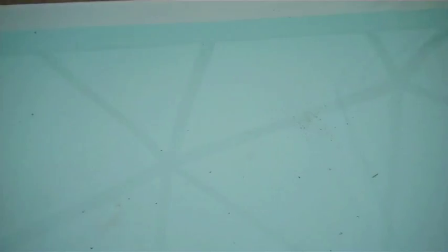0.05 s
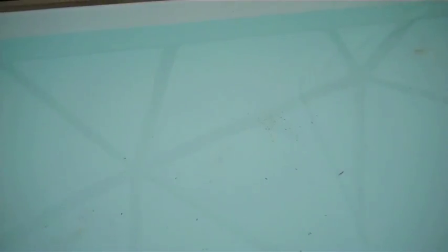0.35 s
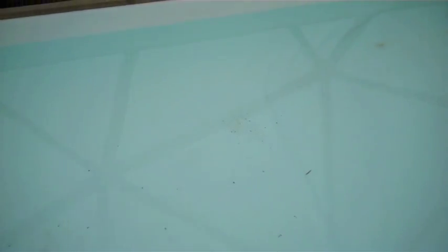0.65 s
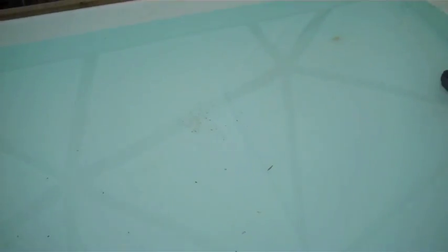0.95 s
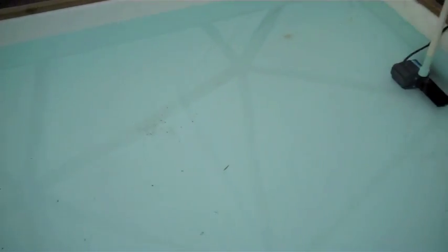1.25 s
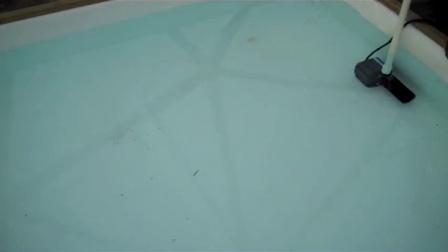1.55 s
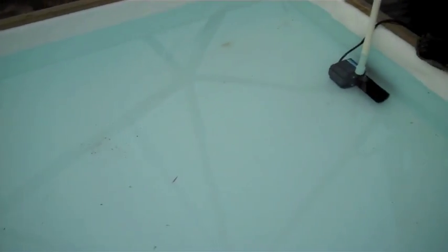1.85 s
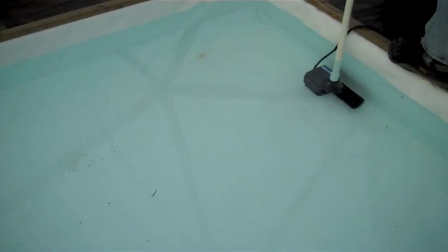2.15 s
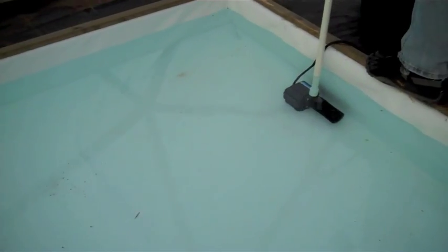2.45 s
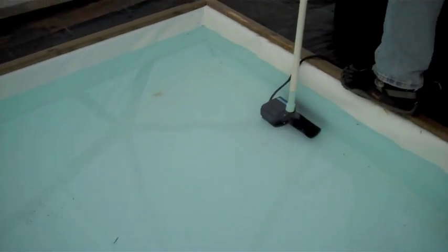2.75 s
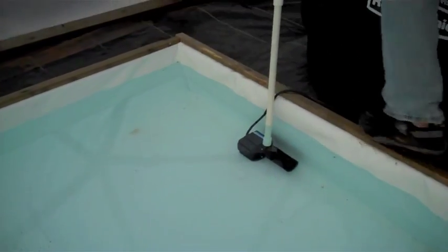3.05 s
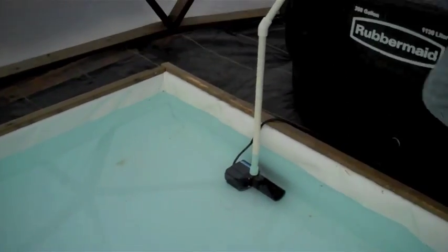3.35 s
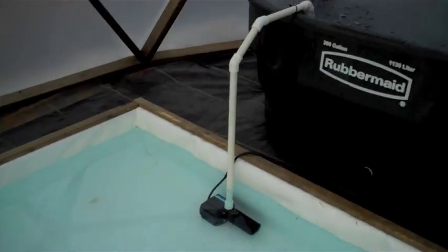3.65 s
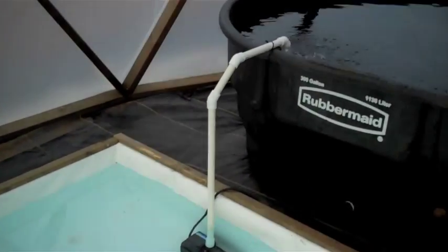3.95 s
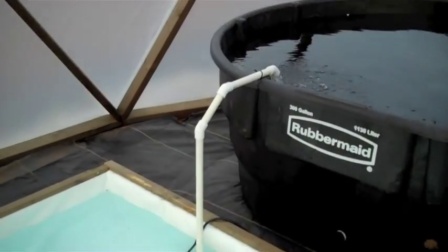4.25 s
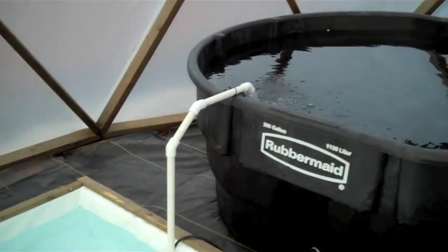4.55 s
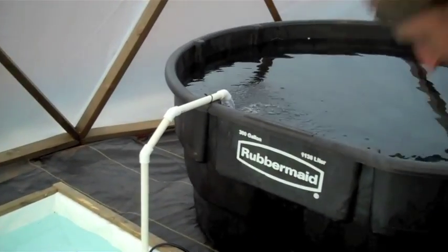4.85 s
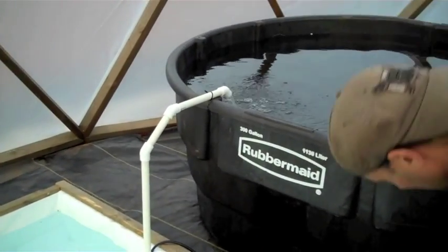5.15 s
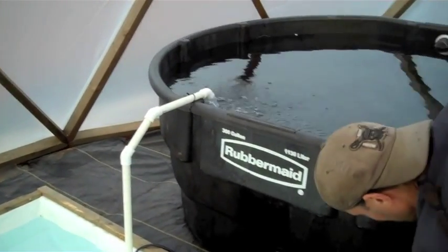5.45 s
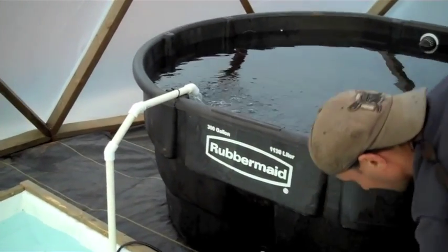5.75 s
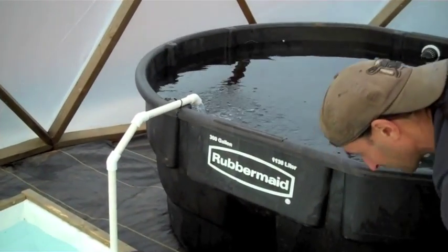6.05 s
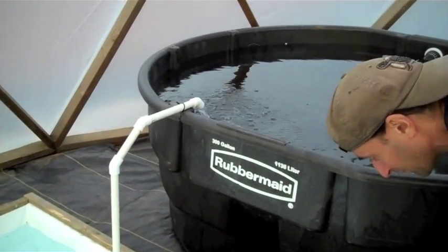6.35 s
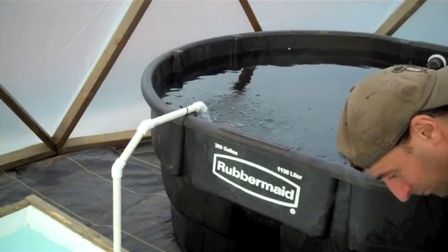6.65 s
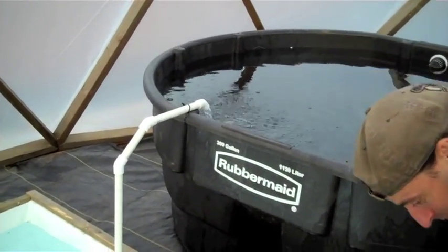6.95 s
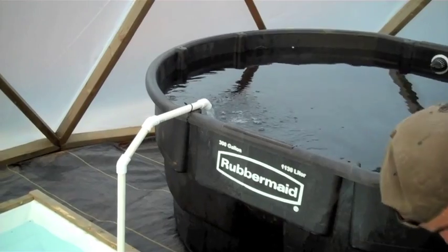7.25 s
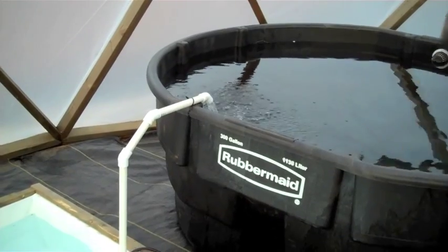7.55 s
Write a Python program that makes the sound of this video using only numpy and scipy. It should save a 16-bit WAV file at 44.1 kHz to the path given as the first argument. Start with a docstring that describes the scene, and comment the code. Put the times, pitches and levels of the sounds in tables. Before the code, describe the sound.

Inside a greenhouse dome, a pumped stream of water splashes unevenly into a big tank, with hollow gurgles, small bubble plinks and crisp droplets. The treble-heavy microphone moves nearer, so the bubbling and a low motor hum slowly grow, joined by a few quiet foot scuffs. Past the middle the flow spurts with a spray hiss, then settles. One sharp, hard clack rings briefly near the end while the water runs on.

```python
"""A submersible pump sends water through a pipe into a big plastic tank under a greenhouse dome.
From the start, trapped air gurgles and fizzes, drops smack on the surface, and pump and fan hum.
From about two seconds someone shuffles closer and the gurgle grows. Near six seconds the jet surges
in a hiss of spray; just before the end something hard clacks once and the dome answers.
It is all heard through two small microphone ports, each ringing at its own treble pitch."""
import sys
import numpy as np
from scipy import signal
from scipy.fft import rfft, irfft, next_fast_len
from scipy.io import wavfile
from scipy.ndimage import map_coordinates

SR = 44100
rng = np.random.default_rng(int(sys.argv[2]) if len(sys.argv) > 2 else 0)


def generate_wav(sig):
    """Save sig (samples, or channels by samples) to the path in sys.argv[1] as 16-bit PCM at SR."""
    pcm = np.round(np.clip(np.atleast_2d(sig).T, -1, 1) * 32767).astype(np.int16)
    wavfile.write(sys.argv[1], SR, pcm)


N = 343980

# Levels are fader settings within each layer; ride curves act as swings about their own mean.
# ride of the splashing where the jet lands: (time [s], level [dB])
FLOW_RIDE = [(0.0, -36), (0.37, -36), (0.85, -39.5), (1.21, -36.5), (1.87, -38), (2.37, -34.5), (3.65, -35),
             (4.78, -33.5), (5.04, -34.5), (5.65, -29), (5.76, -26), (5.97, -30), (6.36, -33), (7.0, -33.5),
             (7.54, -30.5), (7.8, -33)]
# ride of the gurgle, growing as the rim comes closer: (time [s], level [dB])
GURGLE_RIDE = [(0.0, -50), (1.0, -53), (2.78, -48), (3.76, -45.5), (4.63, -46.5), (5.84, -42),
               (6.52, -42.5), (6.78, -46.5), (7.8, -46)]
# ride of the fine spray, thickest in the surge: (time [s], level [dB])
SPRAY_RIDE = [(0.0, -55.5), (0.35, -58), (1.17, -56), (1.74, -58), (3.06, -54.5), (3.6, -57.5), (3.95, -54),
              (5.06, -54), (5.45, -51), (5.82, -44), (6.34, -51.5), (7.8, -51.5)]
# air pockets deep under the jet: (lowest pitch [Hz], highest pitch [Hz], level [dB], share of ride)
GLUG_BANDS = [(465, 559, -64.5, 0.6), (579, 714, -61.5, 0.56), (702, 814, -59.5, 0.079)]
# slugs of water plunging in: (time [s], accent [dB])
WATER_SLUGS = [(0.185, 5), (0.60, 6), (0.74, 5), (0.961, 10.5), (1.26, 4.5), (1.535, 10.5), (2.13, 5.5),
               (2.82, 4.5), (3.06, 3.5), (3.63, 3.5), (3.93, 5), (4.26, 6), (4.87, 2), (5.31, 4),
               (6.45, 4.5), (6.68, 6.5), (7.23, 0.5)]
# featured drops smacking the surface: (time [s], level [dB], pitch [Hz])
DROP_HITS = [(0.1096, -23, 7120), (0.1567, -13.5, 6950), (0.195, -17, 7450), (0.322, -17, 5810),
             (0.4254, -20, 6080), (0.6365, -14, 5800), (1.2217, -14.5, 6540), (1.3236, -18.5, 6270),
             (1.429, -17.5, 7300), (1.614, -18.5, 6350), (1.951, -14.5, 7840), (1.9959, -21, 7370),
             (2.0748, -21, 7740), (2.1505, -19, 6010), (2.1939, -15, 6060), (2.249, -15.5, 6100),
             (2.389, -17.5, 7900), (2.4435, -14.5, 7640), (2.4912, -19, 7480), (2.727, -19, 7460),
             (2.809, -13.5, 7450), (2.942, -18.5, 5900), (3.1258, -11.5, 7250), (3.4835, -20, 7300),
             (3.6144, -19, 7300), (3.6376, -16, 7340), (3.7727, -16.5, 8260), (4.1144, -11.5, 6360),
             (4.3178, -13.5, 7600), (4.5324, -6.5, 5350), (4.6179, -9.5, 6400), (4.6992, -13, 5750),
             (4.9237, -11.5, 6340), (5.238, -7, 6020), (5.2579, -12, 5990), (5.3185, -9, 5320),
             (5.3567, -12.5, 5840), (5.5445, -14, 7500), (5.7024, -10.5, 6200), (6.0815, -6.5, 5930),
             (6.1659, -7, 5240), (6.2454, -3, 7500), (6.615, -12.5, 6340), (6.808, -23, 7680),
             (7.0525, -12, 5540), (7.1127, -11, 5070), (7.2104, -12, 5840), (7.338, -15.5, 7500)]
# featured bubbles that ring out: (time [s], level [dB], pitch [Hz])
PLINK_HITS = [(0.185, -16, 3150), (0.643, -31, 1280), (1.256, -31.5, 1420), (1.448, -23, 3700),
              (1.767, -32.5, 1264), (1.885, -31, 1760), (2.94, -19, 4000), (3.057, -29, 1620),
              (3.194, -24.5, 2230), (3.404, -22, 3330), (3.255, -29, 1700), (4.029, -30, 1500),
              (4.06, -27, 1100), (4.288, -24, 2380), (4.701, -18.5, 3780), (4.919, -21.5, 2880),
              (5.12, -22.5, 2240), (5.122, -18, 3470), (5.416, -20, 3200), (6.569, -21.5, 3280)]
# featured bubbles that burst: (time [s], level [dB])
SNAP_HITS = [(0.9272, -33), (1.5359, -37), (2.5323, -34), (2.7062, -41), (2.9433, -29), (4.0236, -28.5),
             (4.1143, -25), (4.5633, -26.5), (5.3108, -28), (6.2439, -21), (6.8732, -18), (7.0512, -26),
             (7.112, -23.5)]
# contacts of the clack: (time [s], strength [dB], low-pass cutoff [Hz])
CLACK_CONTACTS = [(7.3892, -11, 7000), (7.3963, 1.5, 12000), (7.3982, 1.5, 2800), (7.398, -7, 7000),
                  (7.4057, -8.5, 10000)]
# modes of the hard object: (pitch [Hz], level [dB], t60 [s])
CLACK_RINGS = [(300, -36, 0.03), (1070, -29, 0.013), (1700, -17.5, 0.0096), (2240, -11.5, 0.0039),
               (3100, -8, 0.0029)]
# feet shuffling and bumping on the floor: (time [s], level [dB], thud pitch [Hz])
FOOTFALLS = [(2.294, -37, 303), (2.96, -41, 478), (3.546, -30.5, 500), (3.57, -32, 490),
             (3.598, -30.5, 483), (4.273, -35, 310), (4.489, -35.5, 505), (6.29, -33, 318),
             (7.09, -33.5, 603)]
# hum of the pump: (pitch [Hz], level [dB])
PUMP_TONES = [(97, -63.5), (120, -68.5), (301, -68)]
# hum of the fan, louder near the tank: (time [s], fundamental [dB], octave [dB])
FAN_LEVELS = [(0, -66, -80), (1.3, -66, -75), (2.2, -62.5, -72.5), (3.2, -67.5, -66.5), (5.0, -59, -66),
              (5.5, -59, -63.5), (5.9, -59.5, -58.5), (6.8, -57, -56.5), (7.3, -57, -62), (7.8, -54.5, -58)]
# EQ of bubbles, spray, clack tail, scuffs and rumble: (frequency [Hz], level [dB])
BUBBLE_EQ = [(400, -50), (520, 7), (620, -5), (760, 16), (950, -1.5), (1250, 1.5), (1600, -2), (2100, -4),
             (2800, -2.5), (4000, -4), (5600, 3.5), (7600, 3.5), (9500, -5.5), (14000, 1)]
SPRAY_EQ = [(300, -7), (1000, -12), (3000, 2.5), (6000, 0.5), (10000, 1), (14000, 8.5)]
CLACK_TAIL_EQ = [(100, -30), (280, -9), (450, -23), (800, -7), (1200, -3), (1600, -0.5), (2800, 3),
                 (4000, -4.5), (7500, -7), (14000, -10)]
SCUFF_EQ = [(60, -14), (140, 1), (280, -4), (600, 1), (1200, 4), (3000, -33), (9000, -40)]
RUMBLE_EQ = [(20, -23), (45, -6), (70, -1), (110, 3), (160, -3), (220, -5.5), (400, -7), (800, -1),
             (2000, -12.5), (10000, -31)]
# hollow resonances of the tank: (pitch [Hz], width [Hz], level [dB])
TANK_RESONANCES = [(495, 20, -8.5), (753, 39, -4), (1180, 210, -38.5), (1580, 120, -10.5)]
# the microphone's turn towards the tank: (time [s], delay at the left port [ms])
MIC_TURN = [(0, 0.065), (1.3, 0.073), (2.3, 0.047), (7.8, 0.024)]
# microphone ports, left then right: (resonance [Hz], width [Hz], roll-off [Hz])
MIC_PORTS = [(7680, 1385, 61000), (5906, 880, 8130)]


def stream(flow_db, heave_db, gush_hz=43):
    """The jet drags air under in gushes: pockets glug, big bubbles gurgle, smaller babble and fizz."""
    near_db, gush = swing(GURGLE_RIDE), drift(gush_hz)
    glugs = 0
    for low_hz, high_hz, db, share in GLUG_BANDS:
        pocket = bubbles(grains(per_s=130, spread_db=3.5), low_hz, high_hz, cycles=38, count=5)
        glugs += pocket * from_db(db + share * near_db)
    gurgle = bubbles(grains(per_s=2200, spread_db=2.5), low_hz=904, high_hz=1978, cycles=20.4, count=24)
    babble = bubbles(grains(per_s=1000, spread_db=2.8), low_hz=2017, high_hz=4534, cycles=16.3, count=32)
    fizz = bubbles(grains(per_s=1600, spread_db=5), low_hz=4710, high_hz=13140, cycles=18.3, count=20)
    return (glugs
            + gurgle * from_db(-48 + 1.22 * near_db + 0.52 * heave_db + 1.53 * gush)
            + babble * from_db(-45.5 + 1.02 * flow_db + 0.99 * heave_db + 2 * gush)
            + fizz * from_db(-44.5 + 1.29 * flow_db + heave_db + 3 * gush))


def bubbles(clicks, low_hz, high_hz, cycles, count):
    """Each click rings a bubble of one of `count` sizes for a number of cycles; rms 1."""
    size_index = rng.integers(0, count, N)
    rings = sum(hz * eq_gain(BUBBLE_EQ, hz) * ring(clicks * (size_index == k), hz, cycles / hz)
                for k, hz in enumerate(np.geomspace(low_hz, high_hz, count)))
    return rms_one(cut(rings, 0.81 * low_hz, "high", order=3))


def heave(slosh_hz=6.1):
    """The uneven jet heaves at random and now and then lets go a slug of water; in dB."""
    t = np.arange(N) / SR
    slugs_db = sum(db * burst(t - s, swell_s=.026, fall_s=.026) for s, db in WATER_SLUGS)
    return 0.62 * drift(slosh_hz) + slugs_db


def spray(heave_db):
    """Fine droplets crackle, merging into a smooth hiss as they thicken."""
    spray_db = swing(SPRAY_RIDE)
    per_s = 800 * from_db(2.6 * spray_db)
    crackle = grains(per_s, spread_db=3.5) / np.sqrt(np.minimum(per_s, SR))
    crackle *= from_db(2 * drift(12))
    return equalise(crackle, SPRAY_EQ) * from_db(-40.5 + 1.33 * spray_db + 0.77 * heave_db)


def drops(falls, ping_s=0.0002, scatter_s=0.0048, bubble_cycles=60, satellites=4):
    """A drop smacks with a tight ping and traps a tiny ringing bubble; satellites land around it."""
    t = np.arange(SR // 40) / SR
    ping = t / ping_s * np.exp(1 - t / ping_s)
    out = np.zeros(N)
    for (s, db, hz), chance in zip(falls, rng.standard_normal((len(falls), satellites, 3))):
        bubble = from_db(-15) * fade(t, bubble_cycles / hz) * (1 - np.exp(-t / ping_s))
        envelope = from_db(-9.5) * ping + bubble
        add(out, s + .0006, from_db(db) * envelope * np.sin(2 * np.pi * hz * t))
        for when, size, detune in chance:
            satellite = np.sin(2 * np.pi * hz * np.exp(.1 * detune) * t) * ping
            add(out, s + .001 + scatter_s * when, from_db(db - 15 + 0.86 * size) * satellite)
    return out


def spatter(falls):
    """Around each drop a shower of droplets swells and dies, in proportion to the drop."""
    t = np.arange(-SR // 25, SR // 25) / SR
    shower = burst(t, swell_s=0.0069, fall_s=0.0043)
    level = np.zeros(N)
    for s, db, _ in falls:
        add(level, s + 0.0017 + t[0], from_db(db - 26) * shower)
    droplets = grains(per_s=2700, spread_db=5)
    return level * bubbles(droplets, low_hz=4420, high_hz=10900, cycles=3.4, count=14)


def plinks(cycles=38, rise=0.059, attack_s=0.0024, detune=0.041, stagger_s=.0022, count=4):
    """An air pocket breaks into like-sized bubbles; each rings and bends up as it nears the surface."""
    t = np.arange(SR // 10) / SR
    attack = np.minimum(t / attack_s, 1)
    plop_db = -37 + 0.71 * swing(GURGLE_RIDE)
    pockets = PLINK_HITS + at_random(plop_db, per_s=7, spread_db=2.9, low_hz=1100, high_hz=3000)
    out = np.zeros(N)
    for (s, db, hz), chance in zip(pockets, rng.standard_normal((len(pockets), count, 2))):
        life_s = cycles / hz
        bend = 1 + rise * (np.minimum(t / life_s, 1) - .3)
        for k, (sharp, late) in enumerate(chance):
            pitch = hz * np.exp(detune * sharp) * bend
            bubble = np.sin(2 * np.pi * np.cumsum(pitch) / SR) * fade(t, life_s) * attack
            add(out, s + stagger_s * (k + 0.304 * late), from_db(db + 0.5 - 1.6 * k) * bubble)
    return out


def snaps():
    """A bursting film gives one bright click; lesser ones come at random and grow with the spray."""
    clicks = grains(per_s=8, spread_db=2) * from_db(-38.5 + 0.6 * swing(SPRAY_RIDE))
    for s, db in SNAP_HITS:
        add(clicks, s + .0006, from_db(db) * signal.unit_impulse(2))
    return from_db(26.5) * cut(clicks, 8700, "high")


def clack(crunch_t60=0.0055, tail_t60=0.41, predelay_s=0.0027):
    """A few quick, gritty contacts crack and ring; the dome answers with a dense, dying wash."""
    t = np.arange(SR // 100) / SR
    force = np.zeros(N)
    for s, db, bright_hz in CLACK_CONTACTS:
        crunch = rms_one(rng.standard_normal(len(t)) * fade(t, crunch_t60)) / np.sqrt(len(t))
        add(force, s, from_db(db) * cut(crunch, bright_hz, "low"))
    body = sum(cut(from_db(db) * ring(force, hz, t60), 0.77 * hz, "high") for hz, db, t60 in CLACK_RINGS)
    hit = from_db(9) * cut(force, 1580, "high") + body
    age = np.maximum(np.arange(N) / SR - CLACK_CONTACTS[1][0] - predelay_s, 0)
    wash = mid_side(noise(CLACK_TAIL_EQ), cut(noise(CLACK_TAIL_EQ), 2200, "high", order=1))
    tail = wash * fade(age, tail_t60) * (1 - fade(age, 0.0077))
    early = reflections(hit, first_s=0.01, t60=0.076, wide_hz=1500)
    return hit + from_db(-5) * early + from_db(-23) * tail


def steps(scuff_t60=0.1, thud_t60=0.094, attack_s=0.027):
    """Feet make soft, dull scuffs on the covered floor, each with a low thud."""
    t = np.arange(SR // 4) / SR
    scuff_level, thuds = np.zeros(N), np.zeros(N)
    for s, db, hz in FOOTFALLS:
        add(scuff_level, s - .004, from_db(db - 3.5) * fade(t, scuff_t60) * (1 - fade(t, attack_s)))
        add(thuds, s, from_db(db - 9.5) * fade(t, thud_t60) * np.sin(2 * np.pi * hz * t))
    return scuff_level * noise(SCUFF_EQ) + thuds


def motors(fan_hz=72.8, growth_db_per_s=.7):
    """Pump and fan hum with a slight waver, over a bed of rumble that grows as the fan comes nearer."""
    t = np.arange(N) / SR
    fan_db, octave_db = in_time(FAN_LEVELS)
    hum = 0
    for hz, db in PUMP_TONES + [(fan_hz, fan_db), (2 * fan_hz, octave_db)]:
        level = np.sqrt(2) * from_db(db + 0.42 * drift(1.7))
        hum += level * np.sin(2 * np.pi * hz * t + 0.37 * drift(0.78))
    rumble = mid_side(noise(RUMBLE_EQ), from_db(-8.5) * noise(RUMBLE_EQ))
    return hum + from_db(-58.5 + growth_db_per_s * t) * rumble


def tank_hollow(x):
    """The air between the water and the rim rings at a few broad pitches."""
    out = 0
    for hz, width, db in TANK_RESONANCES:
        r = np.exp(-np.pi * width / SR)
        feedback = [1, -2 * r * np.cos(2 * np.pi * hz / SR), r * r]
        out += from_db(db) * signal.lfilter(np.array([1, 0, -1]) * (1 - r * r) / 2, feedback, x)
    return out


def reflections(x, first_s, t60, wide_hz):
    """Dense dying echoes; long waves reach both ports alike, short ones spread wide."""
    t = np.arange(SR // 2) / SR
    onset = np.clip((t - first_s) * 1000, 0, 1)
    mid, side = rng.standard_normal((2, len(t))) * fade(t, t60) * onset
    echoes = rms_one(mid_side(mid, cut(side, wide_hz, "high", order=1))) / np.sqrt(len(t))
    return signal.fftconvolve(x[None], echoes, axes=1)[:, :N]


def wandering_echoes(x, first_s, t60, wide_hz, count):
    """Splashes land in ever different places, each with its own pattern of echoes."""
    shares = np.array([drift(25) for _ in range(count)])
    shares /= np.sqrt(np.sum(shares ** 2, axis=0))
    return sum(reflections(x * share, first_s, t60, wide_hz) for share in shares)


def mic_turn(pair):
    """Sound from the right reaches the left port late; the lag shrinks as the microphone turns."""
    delay_ms, = in_time(MIC_TURN)
    left = map_coordinates(pair[0], [np.arange(N) - delay_ms * SR / 1000], order=3)
    return np.array([left, pair[1]])


def at_random(level_db, per_s, spread_db, low_hz, high_hz):
    """Scattered small events: rows of (time [s], level [dB], pitch [Hz])."""
    at = np.flatnonzero(rng.random(N) < per_s / SR)
    db = level_db + spread_db * rng.standard_normal(N)
    hz = low_hz * (high_hz / low_hz) ** rng.random(N)
    return list(zip(at / SR, db[at], hz[at]))


def grains(per_s, spread_db):
    """Random clicks of either sign, many small and a few large."""
    sizes = from_db(spread_db * np.minimum(rng.exponential(1, N), 4.5))
    return sizes * rng.choice([-1, 1], N) * (rng.random(N) < per_s / SR)


def drift(rate_hz, hop=40, warm_up=2000):
    """Smooth random modulation; rms 1."""
    r = np.exp(-2 * np.pi * hop * rate_hz / SR)
    white = rng.standard_normal(N // hop + warm_up + 2)
    slow = signal.lfilter([1], [1, -2 * r, r * r], white)[warm_up:]
    return np.interp(np.arange(N) / hop, np.arange(len(slow)), rms_one(slow))


def ring(clicks, hz, t60):
    """Each click sets a dying sine ringing."""
    r, w = np.exp(-np.log(1000) / (t60 * SR)), 2 * np.pi * hz / SR
    return signal.lfilter([0, np.sin(w)], [1, -2 * r * np.cos(w), r * r], clicks + 1e-18)


def noise(eq):
    """Coloured noise; rms 1."""
    return equalise(rng.standard_normal(N), eq)


def equalise(x, eq):
    """Shape a sound with an EQ curve; rms 1."""
    return rms_one(irfft(rfft(x) * eq_gain(eq, np.fft.rfftfreq(N, 1 / SR)), N))


def eq_gain(eq, hz):
    """Gain of an EQ curve at given frequencies."""
    known_hz, db = np.transpose(eq)
    return from_db(np.interp(np.log(hz + 1e-9), np.log(known_hz), db))


def cut(x, hz, kind, order=2):
    """Butterworth low- or high-pass."""
    return signal.sosfilt(signal.butter(order, hz, kind, fs=SR, output="sos"), x + 1e-18)


def fade(t, t60):
    """Exponential decay."""
    return np.exp(-np.log(1000) * t / t60)


def burst(t, swell_s, fall_s):
    """A quick swell up to time zero, then a dying away."""
    return np.exp(np.where(t < 0, t / swell_s, -t / fall_s))


def in_time(rows):
    """Each column of a curve, sample by sample."""
    s, *columns = np.transpose(rows)
    return [np.interp(np.arange(N) / SR, s, column) for column in columns]


def swing(ride):
    """A level ride about its mean, in dB."""
    db, = in_time(ride)
    return db - db.mean()


def add(track, s, sound):
    """Mix a short sound into a track at a given time."""
    start = int(np.clip(round(s * SR), 0, N - 1))
    track[start:start + len(sound)] += sound[:N - start]


def mid_side(mid, side):
    """Mid and side to left and right."""
    return np.array([mid + side, mid - side])


def from_db(db):
    """Decibels to gain."""
    return 10 ** (np.asarray(db) / 20)


def rms_one(x):
    """Scale to unit power."""
    return x / np.sqrt(np.mean(x ** 2) + 1e-20)


def scene():
    """The water echoes briefly in the tank and longer under the dome; drops and snaps sit drier."""
    flow_db, heave_db = swing(FLOW_RIDE), heave()
    drizzle = at_random(-24 + 0.5 * flow_db, per_s=6.4, spread_db=1.2, low_hz=5460, high_hz=8360)
    falls = DROP_HITS + drizzle
    churn = stream(flow_db, heave_db) + spray(heave_db) + spatter(falls) + plinks()
    surface = drops(falls) + snaps()
    tank_send = churn + from_db(-7) * surface
    dome_send = churn + from_db(-5.5) * surface
    tank = wandering_echoes(tank_send, first_s=0.00023, t60=0.052, wide_hz=2200, count=6)
    dome = wandering_echoes(dome_send, first_s=0.0106, t60=0.62, wide_hz=1760, count=5)
    over_rim = from_db(-4) * cut(churn, 4600, "low", order=1)  # the rim shades the treble
    direct = over_rim + tank_hollow(churn) + from_db(-3) * surface
    water = mic_turn(direct + from_db(-1.5) * tank + from_db(-5.5) * dome)
    return water + steps() + clack() + motors()


def record(dry, cutoff_hz=14300):
    """Each port rings as a small cavity; peaks over full scale clip, and the top is cut."""
    size = next_fast_len(N + SR // 10)
    s = 1j * np.fft.rfftfreq(size, 1 / SR)
    ports = []
    for hz, width, top_hz in MIC_PORTS:
        resonance = 1 / (1 + s * width / hz ** 2 + (s / hz) ** 2)
        roll_off = 1 / (1 + np.sqrt(2) * s / top_hz + (s / top_hz) ** 2)
        ports.append(resonance * roll_off)
    heard = irfft(rfft(dry, size) * np.array(ports), size)[:, :N]
    top_cut = signal.ellip(10, .2, 70, cutoff_hz, fs=SR, output="sos")
    return signal.sosfilt(top_cut, np.clip(heard, -1, 1))


dry = scene()
out = record(dry)
generate_wav(out)
```